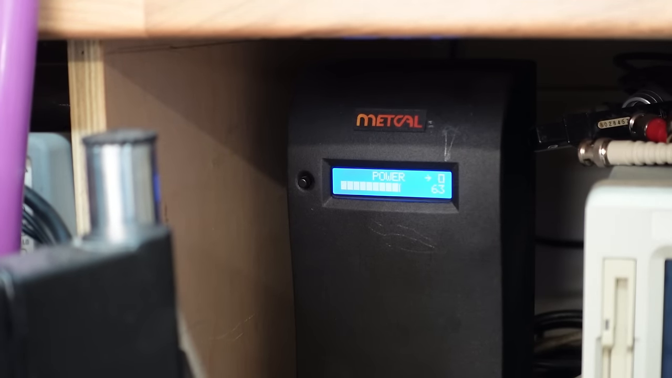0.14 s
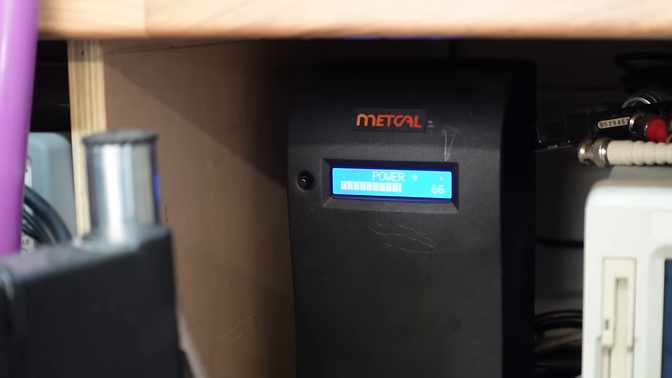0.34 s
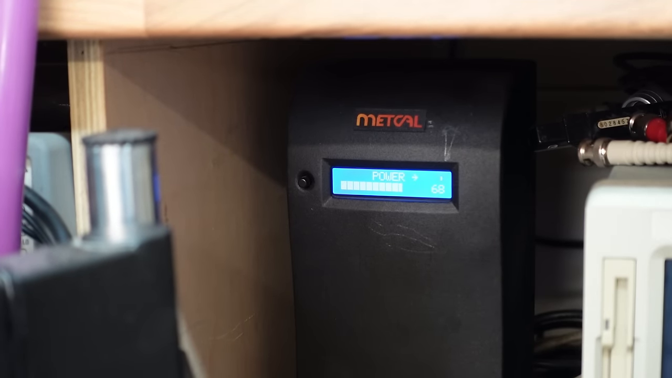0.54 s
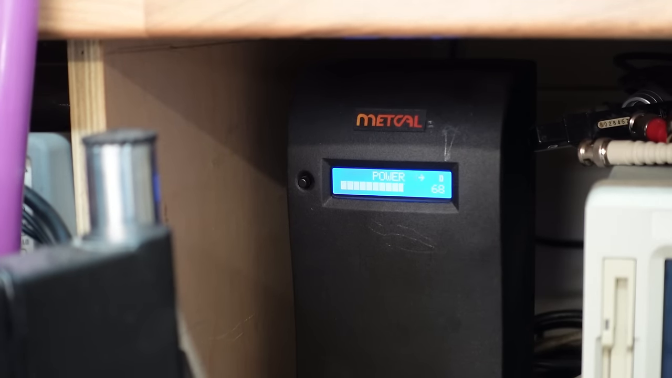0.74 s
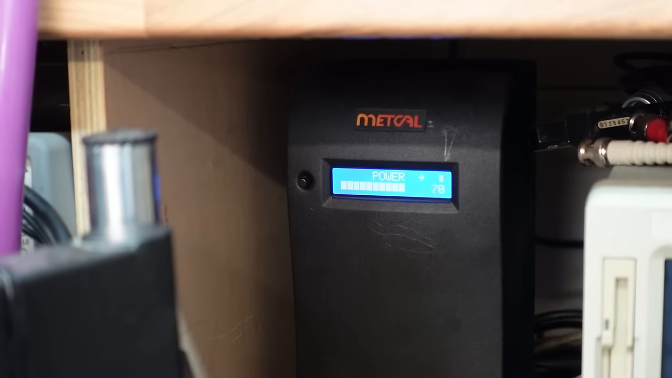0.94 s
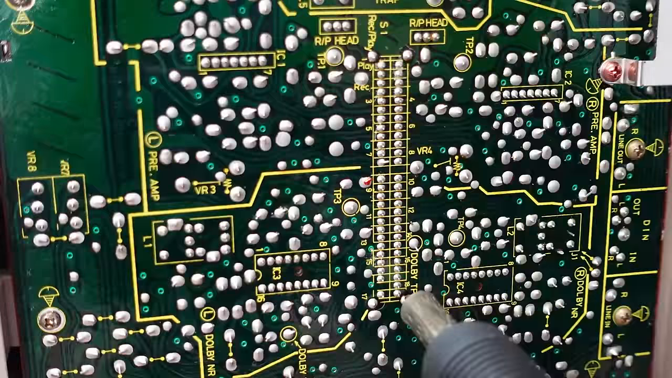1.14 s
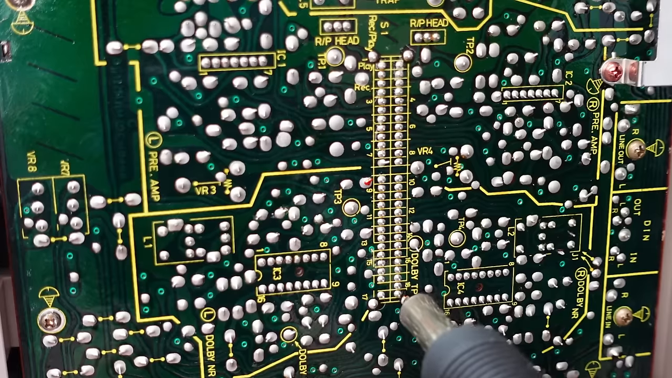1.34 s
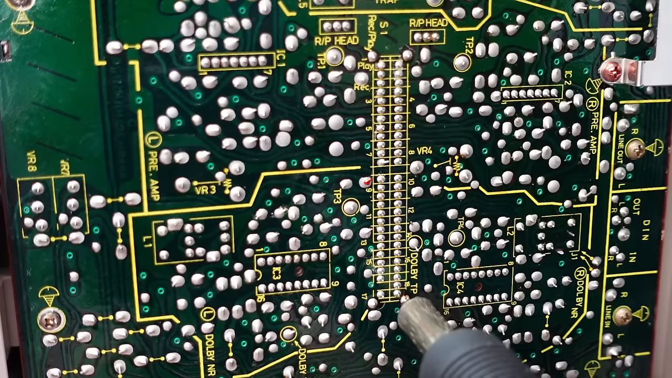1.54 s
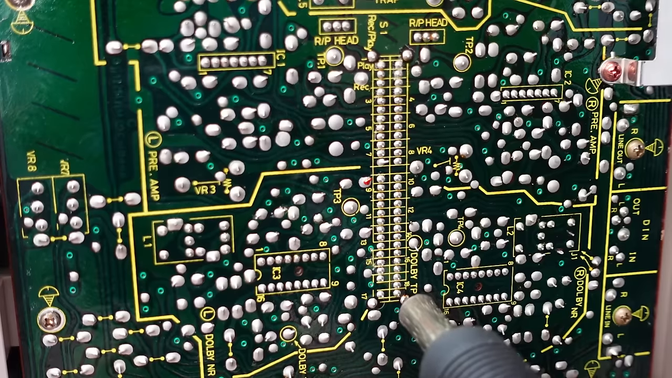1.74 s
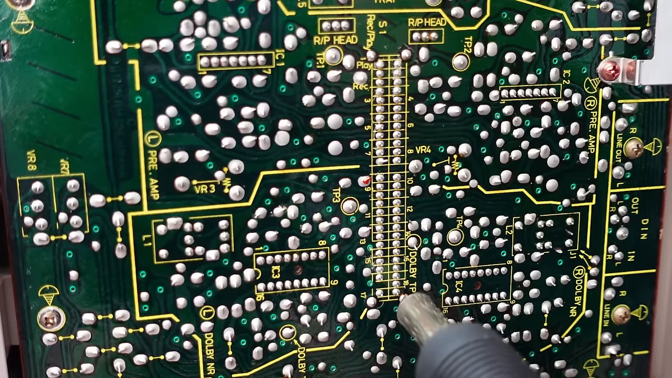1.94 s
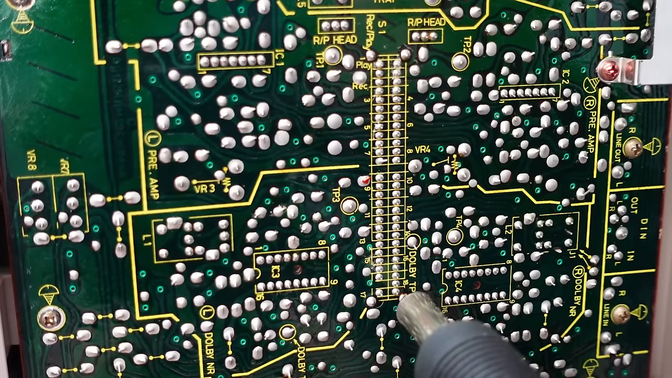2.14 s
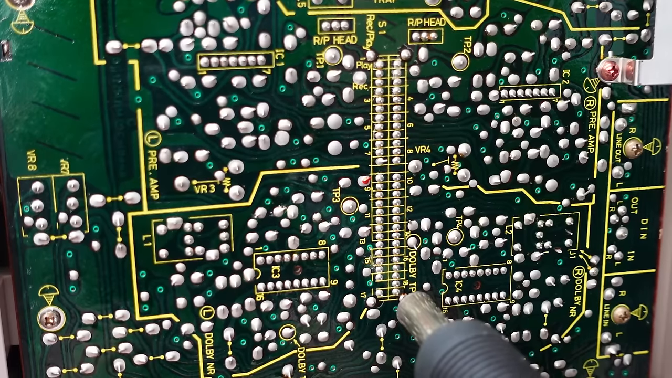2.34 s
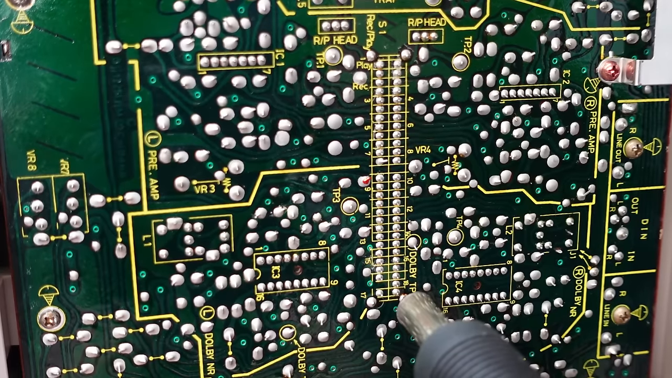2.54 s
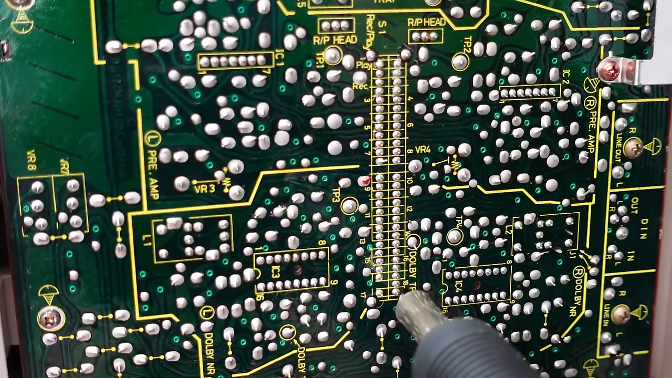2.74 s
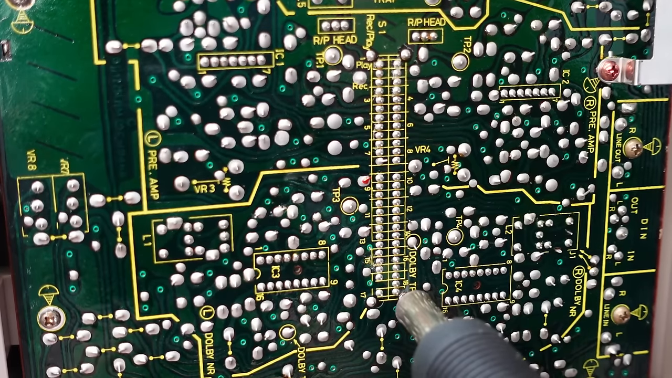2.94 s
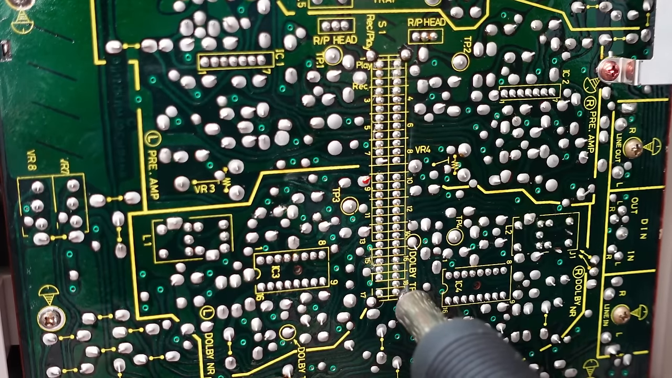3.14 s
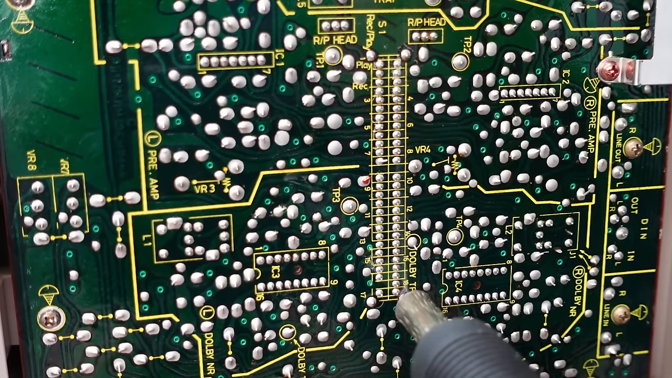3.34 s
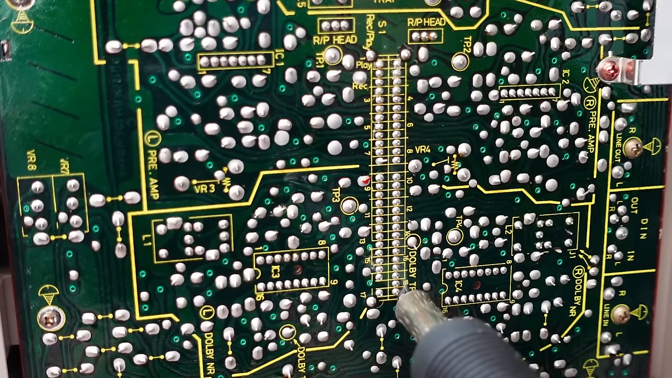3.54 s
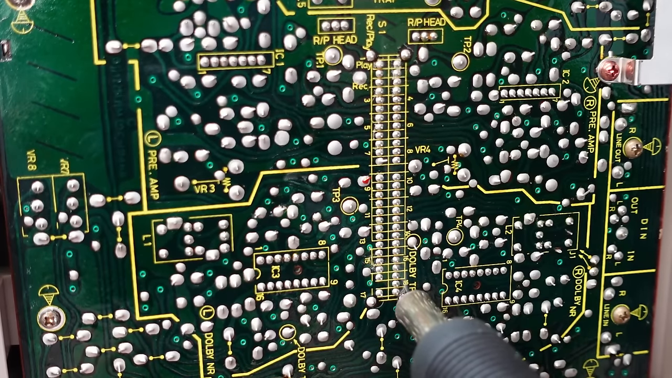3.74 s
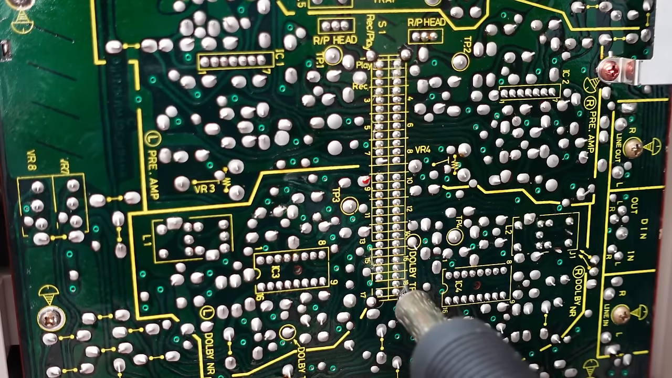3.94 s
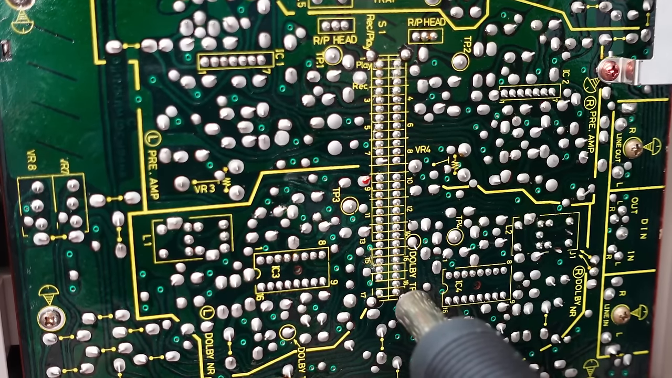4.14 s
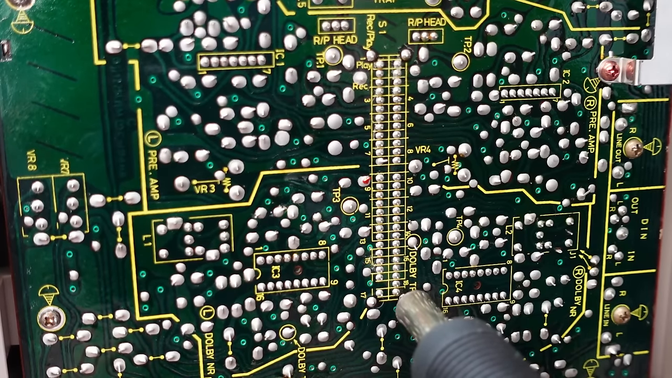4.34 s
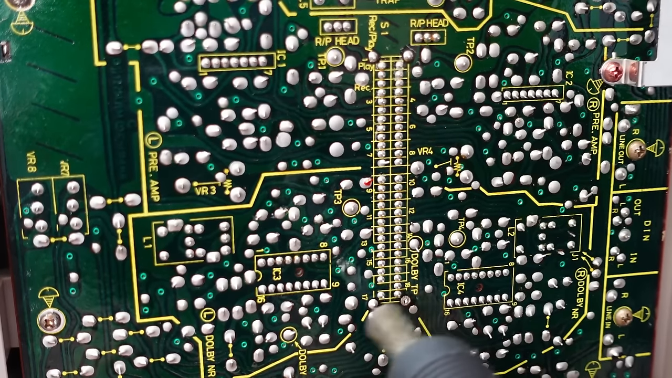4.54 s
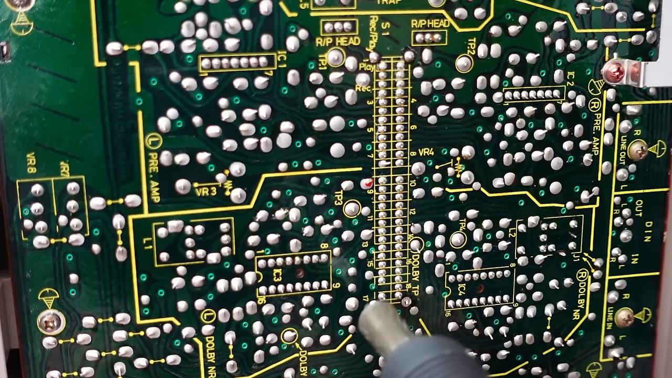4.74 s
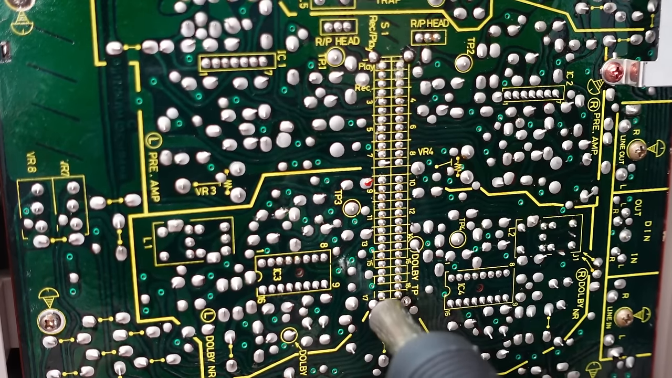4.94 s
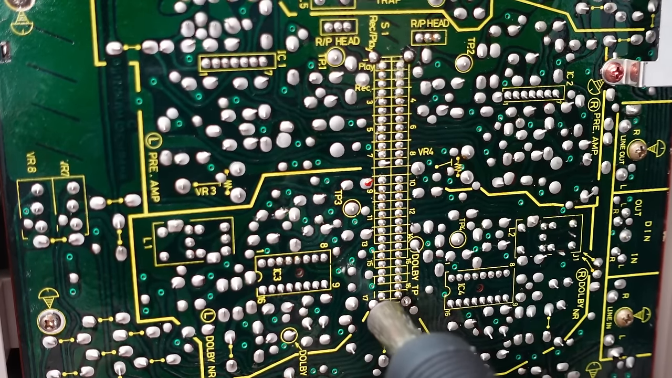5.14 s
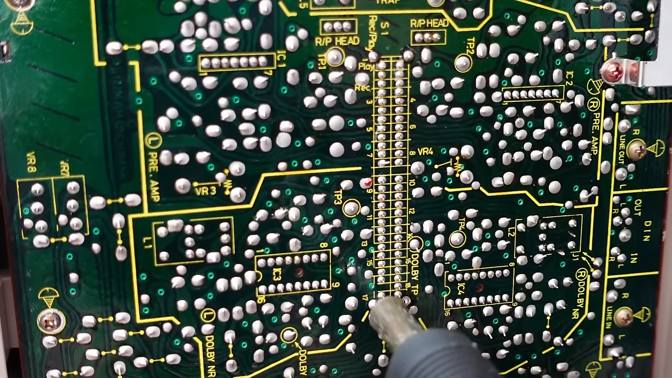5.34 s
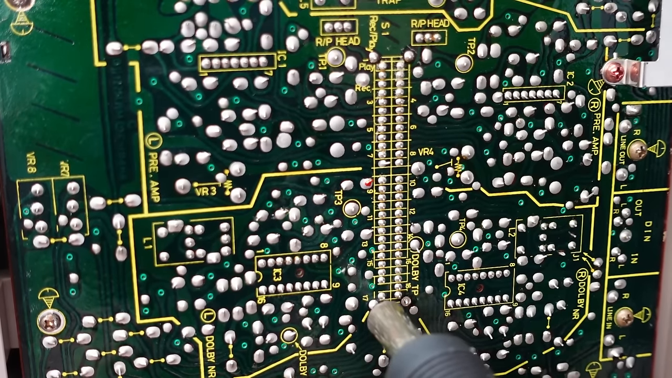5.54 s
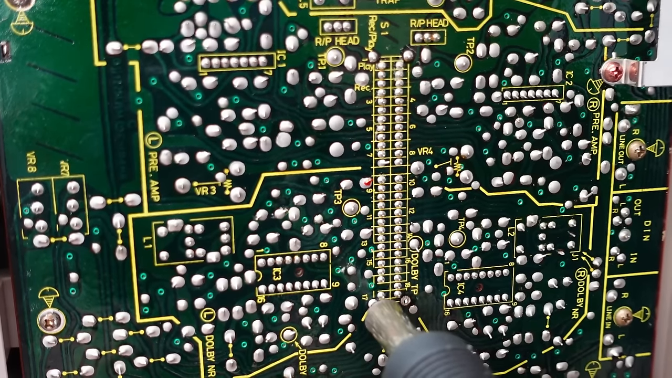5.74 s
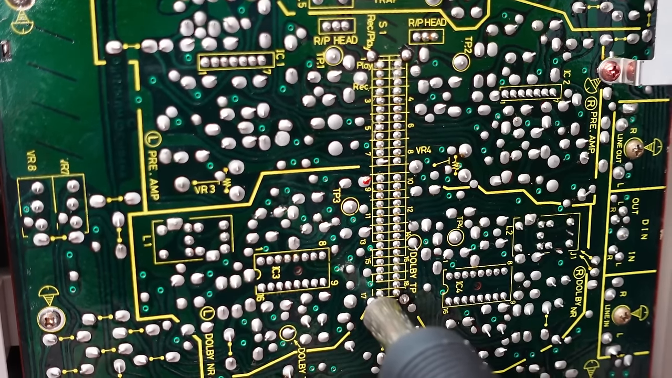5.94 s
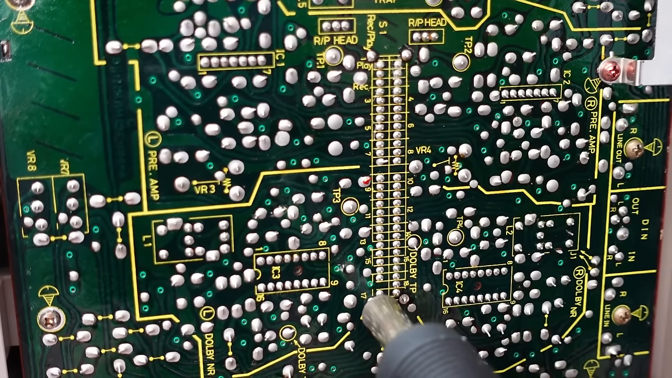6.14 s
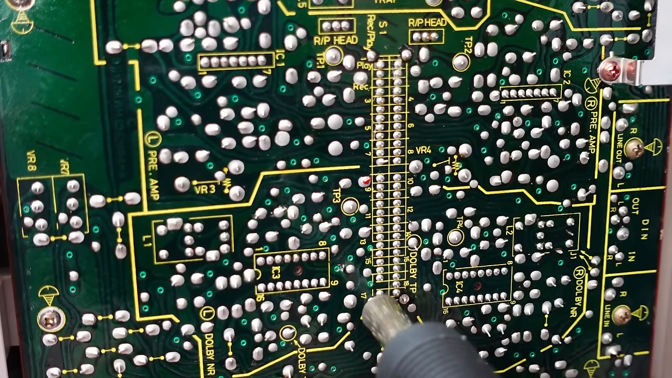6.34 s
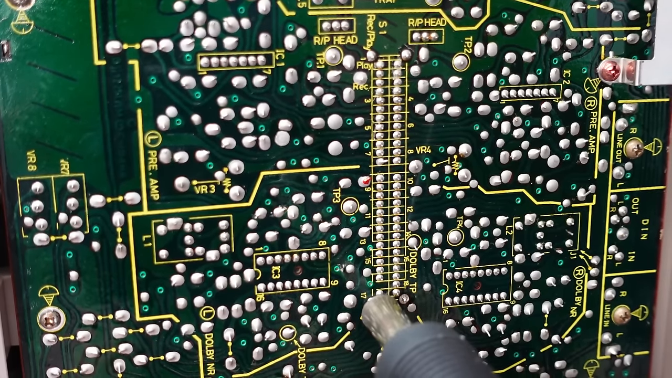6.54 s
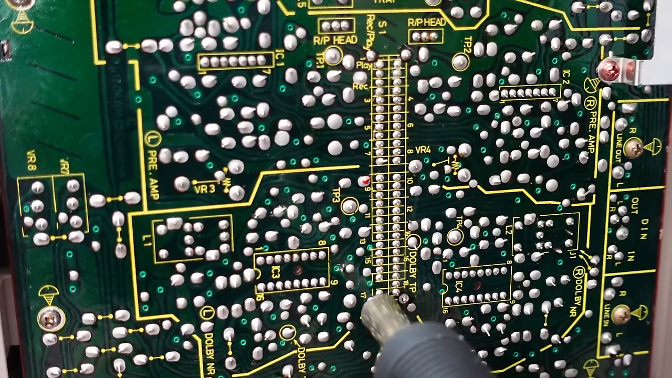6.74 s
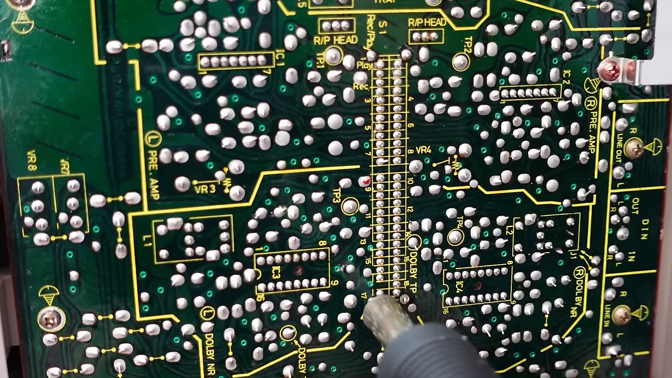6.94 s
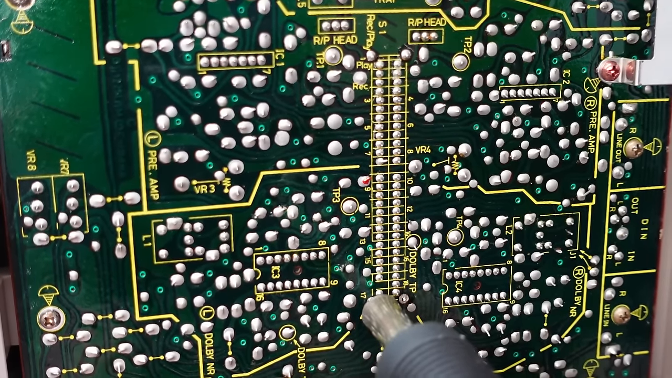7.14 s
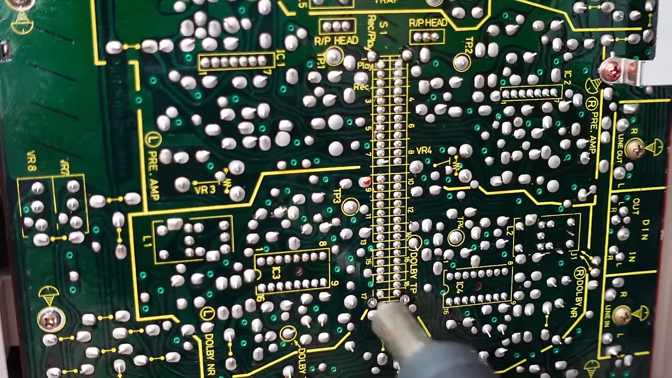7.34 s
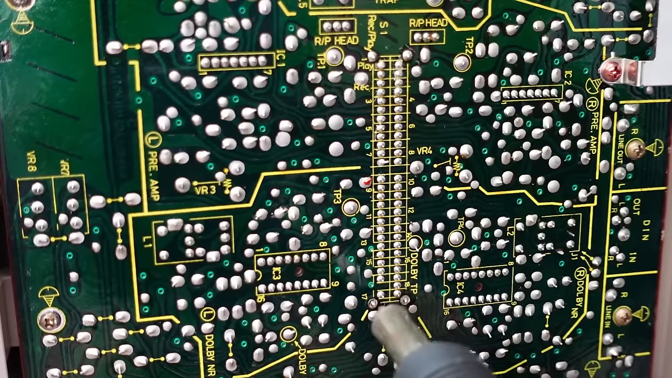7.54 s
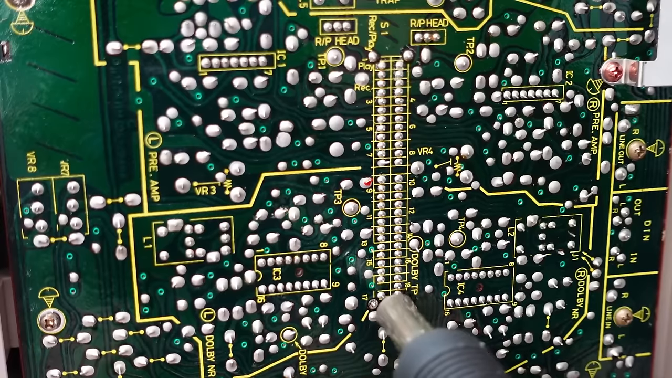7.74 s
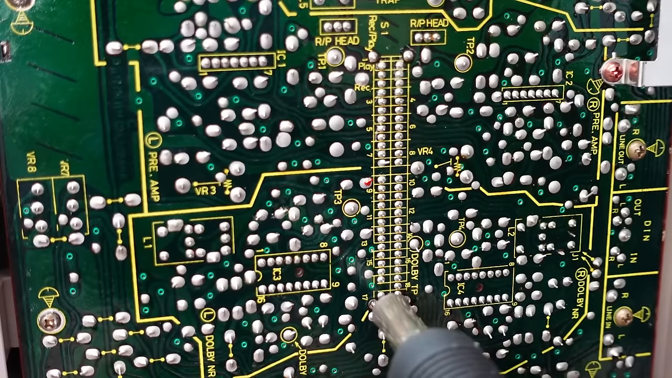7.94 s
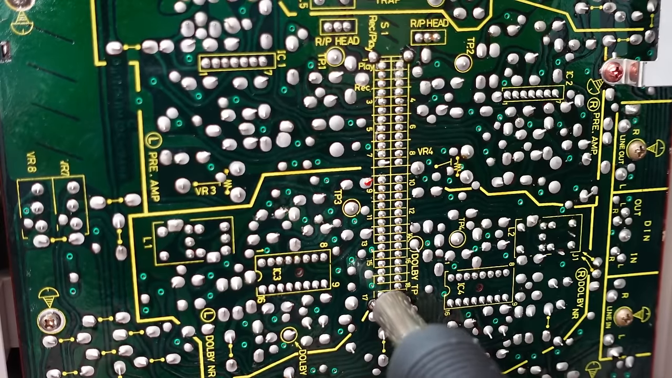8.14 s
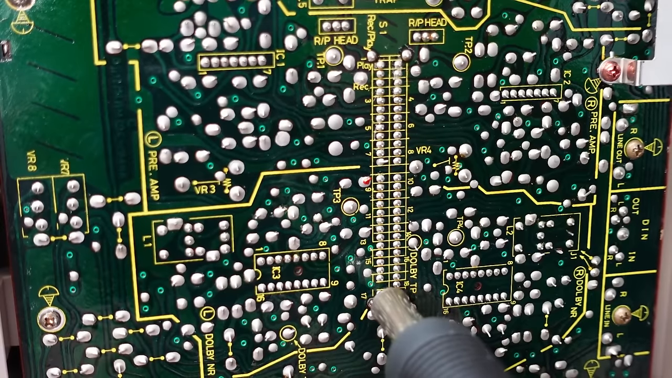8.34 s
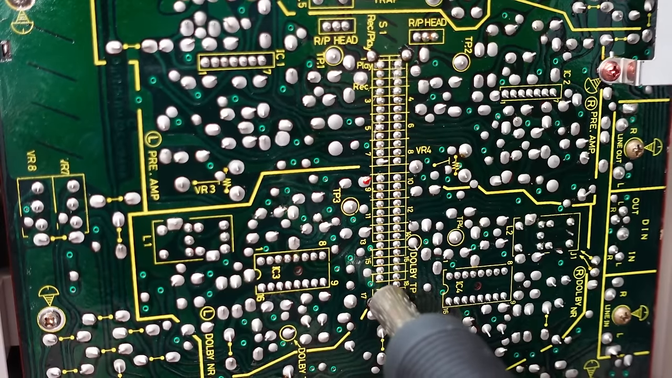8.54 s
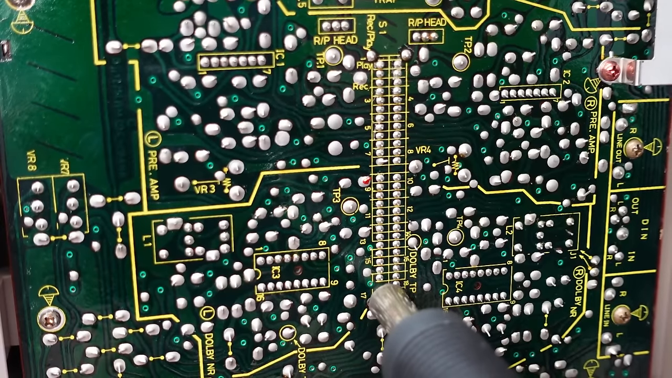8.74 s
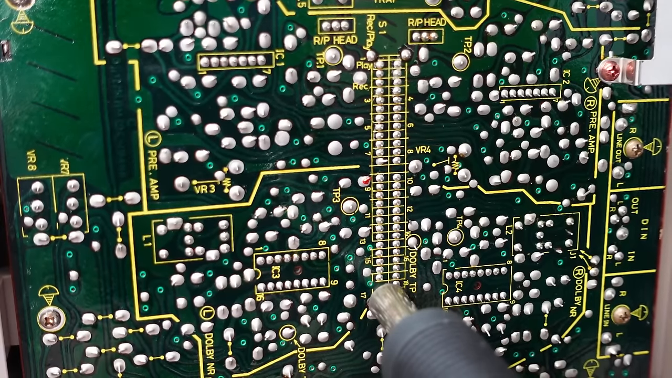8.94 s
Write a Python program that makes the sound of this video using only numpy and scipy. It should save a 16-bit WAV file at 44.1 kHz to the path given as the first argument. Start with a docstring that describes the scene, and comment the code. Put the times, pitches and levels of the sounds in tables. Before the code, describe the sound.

A desoldering gun fires two short, loud air hisses, with light knocks on a circuit board over steady fan noise.

```python
"""Desoldering gun on a workbench

An air-driven gun fires twice: its valve pops open and compressed air hisses out to pull the vacuum.
Each burst ends in a hoot and a sputter of solder. Around the bursts the handpiece knocks, scuffs and
ticks on the circuit board; fans and a faint air leak run throughout. A close mono microphone feeds
a limiter, which ducks the room under each burst."""
import sys
import numpy as np
from scipy import signal
from scipy.fft import rfft, irfft, next_fast_len
from scipy.io import wavfile
from scipy.ndimage import map_coordinates

SR = 44100
rng = np.random.default_rng(int(sys.argv[2]) if len(sys.argv) > 2 else 0)


def store_wav(level_fs):
    """Save 16-bit WAV to argv[1]."""
    pcm = np.round(np.clip(np.atleast_2d(level_fs), -1, 1) * 32767)
    wavfile.write(sys.argv[1], SR, pcm.T.astype(np.int16))


N = 396900
TIME = np.arange(N) / SR
RING = np.arange(SR // 4) / SR  # time since a blow [s]
SEAT_S = 0.0035  # the flow breaks off as the valve seats

# trigger pulls: (valve opens [s], valve shuts [s], jet [dB], closing choke [dB], opening pop [dB],
# shutting pop [dB], hoot [dB], hoot length [s], sputter length [s], nozzle draw [dB])
TRIGGER_PULLS = [(4.0476, 4.4814, 0.5, -6, -4.5, 0, -9.5, 0.026, 0.091, -55),
                 (6.834, 7.3988, 0, -3, 5.5, 1.5, -4, 0.04, 0.046, -23.5)]


def amp(db):
    """Decibels to gain."""
    return 10 ** (np.asarray(db) / 20)


def unit(x):
    """Scale to rms 1."""
    return x / np.sqrt(np.mean(x ** 2) + 1e-20)


def wobble(rate):
    """A smooth random curve, rate knots a second."""
    return map_coordinates(rng.standard_normal(int(N * rate / SR) + 4), [TIME * rate])


def colour(x, points, bands=()):
    """Minimum-phase EQ: a curve through (Hz, dB) points plus bell-shaped peaks and notches."""
    size = 2 * next_fast_len(len(x) // 2 + 4096)
    hz = np.fft.rfftfreq(size, 1 / SR)
    point_hz, point_db = np.transpose(points)
    curve = np.interp(np.log(hz + 1), np.log(point_hz), point_db)
    bells = sum(db * np.exp(-((hz - centre) / width) ** 2) for centre, width, db in bands)
    cepstrum = irfft(np.log(amp(curve + bells)))[:size // 2]
    cepstrum[1:] *= 2
    return irfft(rfft(x, size) * np.exp(rfft(cepstrum, size)))[:len(x)]


def noise(points, bands=(), size=N):
    """Coloured noise of rms 1."""
    return unit(colour(rng.standard_normal(size), points, bands))


def split(x, edge_hz, order=8):
    """Crossover: the parts of x below and above an edge."""
    low = irfft(rfft(x) / (1 + (np.fft.rfftfreq(N, 1 / SR) / edge_hz) ** order), N)
    return low, x - low


def add(track, s, sound):
    """Mix a sound into the track at time s."""
    part = track[round(s * SR):][:len(sound)]
    part += sound[:len(part)]


def envelope(start, attack, hold, fall_db_per_s):
    """Linear attack from start, hold, then a steady fall in dB."""
    age = TIME - start
    return np.clip(age / attack, 0, 1) * amp(-fall_db_per_s * np.maximum(age - attack - hold, 0))


def until(shut):
    """A gate that stays at 1, then dies quickly as the valve seats."""
    return np.exp(-np.maximum(TIME - shut, 0) / SEAT_S)


def ring(modes, scatter_db, attack):
    """Struck modes start together, at new strengths for every blow."""
    hz, db, t60 = np.transpose(modes)[:, :, None]
    db = db + scatter_db * rng.standard_normal(db.shape)
    partials = amp(db - 60 * RING / t60) * np.cos(2 * np.pi * hz * (RING - attack))
    return np.sum(partials, 0) * (1 - np.exp(-(RING / attack) ** 2))


def reflections(x, level_db, t60):
    """Nearby shelves and tools add a dense short echo that ripples the treble; the sum has rms 1."""
    tail = noise([(600, -24.0), (2000, 0.5), (15000, -5)], size=len(RING))
    tail *= amp(-60 * RING / t60) * (RING > .001)
    echo = amp(level_db) * signal.fftconvolve(x, tail / np.linalg.norm(tail))[:N]
    return unit(x + echo)


def fans_and_leak():
    """Fans rush and hum below a steady thin hiss of leaking air."""
    # spectrum of fans and leak: (frequency [Hz], level [dB])
    air_curve = [(25, -13.5), (45, -7.5), (90, -11), (280, 0.0), (450, -15), (1000, -15), (1400, -17),
                 (2000, -25), (2800, -22.5), (3500, -15), (4600, -18.2), (5800, -29), (10500, -34),
                 (15700, -40.5)]
    # its peaks and dips: (centre [Hz], width [Hz], gain [dB])
    air_bands = [(168, 5.7, 6.5), (245, 72, -1.5), (401.3, 5.4, 9.5), (515, 60, 4), (648, 77, 8),
                 (943, 136, 7), (1112, 51, 4.5), (1222, 12, 5.5), (1520, 8.5, 10), (1668, 130, 6),
                 (2134, 270, 5.5), (3950, 430, 5), (6840, 460, 7), (7686, 890, 11.5), (15559, 80, 11)]
    # fan tones: (frequency [Hz], level [dB])
    fan_tones = [(172.3, -70), (500.6, -64), (678.3, -60), (899.0, -61), (1195, -63), (1507, -71),
                 (1653, -65.5)]
    # faint tones that come and go: (start [s], end [s], frequency [Hz], level [dB])
    drones = [(0, 1.4, 1058, -59), (0, 1.2, 15590, -71), (1.8, 10, 1686, -64), (7.42, 8.65, 89.5, -53.5)]
    fans_db, leak_db, fans_early_db, leak_early_db = -45.5, -47, -2, -1
    early = TIME < 1.21  # the fans and leak sound softer until 1.21 s, then the background steps up
    fans, leak = split(noise(air_curve, air_bands), edge_hz=2400)
    leak = reflections(leak, level_db=-11, t60=.12) * amp(leak_db + leak_early_db * early)
    fans = unit(fans) * amp(fans_db + fans_early_db * early + 0.12 * wobble(4.5))
    tone = lambda hz: np.sqrt(2) * np.sin(2 * np.pi * hz * TIME + .5 * wobble(6))
    hum = amp(fans_early_db * early) * sum(amp(db) * tone(hz) for hz, db in fan_tones)
    for start, end, hz, db in drones:
        fade = np.clip(np.minimum(TIME - start, end - TIME) / 0.016, 0, 1)
        hum += amp(db) * tone(hz) * fade
    return fans + leak + hum


def board_knocks():
    """Soft contacts of the handpiece thud, hard ones snap and click; all ring the same board."""
    # knocks: (time [s], level [dB], thud EQ [dB], snap EQ [dB], click EQ [dB])
    hits = [(1.2137, 1, 1.5, 1.5, -6), (1.239, -12, 2, -6, -2), (1.5434, -0.5, 2, 1.5, -6),
            (1.666, -4.5, -7.5, 2, -8), (1.8176, -17, 16.5, -7, -3), (2.7605, -8.5, -5, -2.5, -3),
            (4.548, -6, 2.5, 9.5, -4), (5.257, -18, 16, 5.5, 10), (5.2938, -30, 25, -6, 5),
            (5.5414, -2.5, 5, 5, 8.5), (5.5775, -7.5, 2, -3, 0), (7.9111, -16, 6, -7, 0),
            (8.0662, -28.5, 21, 1, 9), (8.0988, -14, -4, 2.5, 3), (8.194, -15.5, 18, -4, -3),
            (8.558, -17.5, 16.5, 0.5, 4)]
    # modes of board and bench: (frequency [Hz], level [dB], t60 [s])
    board_modes = [(168, -16, 0.13), (211, -9, 0.12), (295.4, -6, 0.11), (325, -5, 0.13), (400, -3, 0.036),
                   (551, -3, 0.068), (682, -5.5, 0.12), (713, -6, 0.064), (880, -11, 0.067),
                   (977, -16, 0.12), (1110, -8, 0.13), (1297, -0.5, 0.072), (1370, 0.5, 0.037),
                   (1420, 0, 0.042), (1770, -10, 0.1), (1940, 1, 0.035), (2127, -5, 0.042),
                   (2180, -14, .04), (2450, -6.5, 0.037), (2550, -15, 0.036), (2980, -5.5, 0.019),
                   (4760, -14, 0.051)]
    # spectrum of the dense upper and cross modes: (frequency [Hz], level [dB])
    rattle_curve = [(60, -17), (200, -2), (700, 8), (2000, -1), (3200, -8.5), (4800, -14.5), (6000, -23),
                    (8000, -19), (15000, -42)]
    # spectrum of the bench's after-ring: (frequency [Hz], level [dB])
    bench_curve = [(80, -29), (290, 4.5), (700, 6.5), (1500, -5), (3000, -18), (9000, -44)]
    pulse_age = RING / .0001
    push = amp(-6) * pulse_age ** 2 * (3 - pulse_age) * np.exp(-pulse_age)  # the first pressure pulse
    swell = 1 - np.exp(-RING / .001)
    track = np.zeros(N)
    for s, db, thud_db, snap_db, click_db in hits:
        rattle = swell * amp(-19 - 60 * RING / 0.079) * noise(rattle_curve, size=len(RING))
        bench = amp(-31 - 60 * RING / 0.33) * noise(bench_curve, size=len(RING))
        board = amp(-21) * ring(board_modes, scatter_db=1.5, attack=.0002)
        contact_eq = [(90, 0), (250, thud_db), (800, 0), (1400, 0), (2300, snap_db), (3200, snap_db),
                      (5000, click_db), (14000, click_db - 0.5)]
        add(track, s, amp(db) * colour(push + board + rattle + bench, contact_eq))
    return track


def tip_scuffs():
    """The tip slides softly over the board in brief grainy rubs that swell and fade."""
    # rubs: (middle [s], half length [s], level [dB])
    rubs = [(1.818, 0.0075, -33.5), (2.718, .02, -44), (2.743, 0.013, -41), (5.405, 0.0095, -36.5),
            (5.73, 0.019, -39), (6.072, 0.0093, -39), (6.094, 0.013, -38.5), (7.973, .005, -43)]
    # friction spectrum: (frequency [Hz], level [dB])
    scrape_curve = [(70, -35), (280, 13.5), (700, -0.5), (2100, -1), (3200, -12), (6000, -21), (14000, -32)]
    pressure = sum(amp(db) * np.exp(-((TIME - s) / length) ** 2) for s, length, db in rubs)
    grain = amp(2 * wobble(400))
    return pressure * unit(grain * noise(scrape_curve))


def tip_ticks():
    """The steel tip touches pins: a speck of contact noise and one short, clear ping each."""
    # touches: (time [s], level [dB], pitch [Hz])
    touches = [(1.994, -45, 10000), (3.0103, -33.5, 3260), (8.0986, -25, 2700), (8.1005, -56, 10800),
               (8.6473, -47, 9500)]
    contact_db, contact_t60, ping_db, ping_t60 = -5.5, 0.028, 0.5, 0.031
    track = np.zeros(N)
    for s, db, hz in touches:
        contact = noise([(hz / 4, -22), (hz, -6), (hz * 2, -20), (hz * 4, -32)], size=len(RING))
        contact *= amp(contact_db - 60 * RING / contact_t60)
        ping = np.sin(2 * np.pi * hz * RING) * amp(ping_db - 60 * RING / ping_t60)
        add(track, s, amp(db) * (contact + ping))
    return track


def valve_pops():
    """Each pressure step gives a short hollow pop: trigger, opening, shutting."""
    # modes of the valve body and air line: (frequency [Hz], level [dB], t60 [s])
    valve_modes = [(170, -16, 0.019), (320, -7.5, 0.024), (655, -18, 0.0067), (920, -1, 0.02),
                   (1230, -12, 0.02)]
    trigger_lead_s, trigger_db = 0.00417, -19.5
    track = np.zeros(N)
    for opens, shut, _, _, open_db, shut_db, *_ in TRIGGER_PULLS:
        for s, db in (opens - trigger_lead_s, trigger_db), (opens, open_db), (shut, shut_db):
            add(track, s, -amp(db) * ring(valve_modes, scatter_db=2, attack=0.00016))
    return track


def airflow(opens, shut, db, choke_db):
    """One pull: a surge, steady flow, a choke as the valve closes, then the gun bleeds empty."""
    open_s, close_s = 0.0015, 0.038  # travel times of the valve
    surge_db, surge_s = 2, 0.11  # the line pressure overshoots at first
    surge = surge_db * np.exp(-np.maximum(TIME - opens, 0) / surge_s)
    choke = choke_db * np.clip(2 * (1 + (TIME - shut) / close_s), 0, 1)
    driven = amp(db + surge + choke) * np.clip((TIME - opens) / open_s, 0, 1) * until(shut)
    bleed = amp(-10.5) * envelope(shut, SEAT_S, hold=0.028, fall_db_per_s=350)
    trickle = amp(-38.5) * envelope(shut, SEAT_S, hold=0, fall_db_per_s=63)
    return np.maximum(driven, np.hypot(bleed, trickle))


def exhaust_jet():
    """The exhaust hisses; as pressure falls its roar fades sooner than its fizz."""
    # exhaust spectrum: (frequency [Hz], level [dB])
    jet_curve = [(250, -66), (500, -22.5), (700, -20), (900, -8), (1500, -3.5), (3000, 1), (6500, -0.5),
                 (9000, -4), (12000, -11.5), (15700, -13)]
    # peaks and notches of the exhaust passage: (centre [Hz], width [Hz], gain [dB])
    passage_bands = [(586, 42, -5.5), (670, 43, 5.5), (1240, 84, 2), (1710, 24, 5), (2100, 210, -3.5),
                     (2525, 43, 2), (2720, 41, 1), (2684, 24, 3), (3410, 170, 3.5), (3590, 55, 2.5),
                     (3910, 66, -5.5), (4180, 19, 2), (4360, 26, 5), (4350, 64, -2), (4990, 190, 3.5),
                     (5530, 160, -4), (5850, 46, 3.5), (6200, 95, 5), (6600, 260, 4.5), (7700, 98, 0.5),
                     (8470, 65, 4), (9030, 120, -1), (10110, 125, 8.5), (10300, 70, -4), (10780, 160, 8.5),
                     (11400, 140, 8.5), (12450, 280, 3.5), (13400, 220, 5), (14600, 110, -1),
                     (15150, 170, -6)]
    flow = sum(airflow(*pull[:4]) for pull in TRIGGER_PULLS)
    hiss = reflections(noise(jet_curve, passage_bands), level_db=-14, t60=.1)
    roar, fizz = split(hiss, edge_hz=3160)
    turbulence = amp(2.0 + 0.34 * wobble(25) + 0.62 * wobble(170))
    return turbulence * (roar * flow ** 1.4 + fizz * flow)


def hoot_and_slurp():
    """The closing valve hoots, solder spits and sputters, then the vacuum dies through the nozzle."""
    # hoot of the narrowing valve gap: (frequency [Hz], level [dB])
    gap_curve = [(400, -30), (800, -16), (1150, -3), (1750, -7), (2200, -29), (6000, -38)]
    # solder and flux sputtering through the tip: (frequency [Hz], level [dB])
    slurp_curve = [(100, -24), (280, 3), (450, 0), (650, 3.5), (1100, 7), (1500, -4), (3000, -21),
                   (8000, -45)]
    # air drawn through the open nozzle: (frequency [Hz], level [dB])
    draw_curve = [(400, -12), (900, -5.5), (1500, -2.5), (3000, -10.5), (4500, -8.5), (6000, -18),
                  (12000, -29)]
    # peaks and a notch of the narrow tip: (centre [Hz], width [Hz], gain [dB])
    tip_bands = [(1346, 50, 9.5), (1590, 64, 8), (2320, 240, 13), (2870, 90, -2), (3140, 160, 12.5)]
    spit_s = 0.003
    narrowing, solder, vacuum = np.zeros((3, N))
    for _, shut, *_, hoot_db, hoot_s, sputter_s, draw_db in TRIGGER_PULLS:
        narrowing += amp(hoot_db) * np.clip(1 + (TIME - shut) / hoot_s, 0, 1) * until(shut - SEAT_S)
        spit = amp(-7.5) * envelope(shut - spit_s / 2, spit_s, hold=0, fall_db_per_s=1100)
        dribble = amp(-19.5) * envelope(shut, spit_s, hold=0.02, fall_db_per_s=26 / sputter_s)
        solder += np.maximum(spit, dribble)
        suction = amp(draw_db) * envelope(shut, attack=0.031, hold=0, fall_db_per_s=56.5)
        vacuum += suction * envelope(shut, SEAT_S, hold=0.36, fall_db_per_s=200)
    hoot = narrowing * noise(gap_curve)
    sputter = solder * amp(0.89 * wobble(160)) * noise(slurp_curve)
    draw = vacuum * amp(0.41 * wobble(60)) * noise(draw_curve, tip_bands)
    return hoot + sputter + draw


def scene():
    """Gun, board and room reach one microphone."""
    gun = exhaust_jet() + hoot_and_slurp() + valve_pops()
    mono = gun + board_knocks() + tip_scuffs() + tip_ticks() + fans_and_leak()
    return np.array([mono, mono])


def limiter(x, ceiling_db, attack, release, slow_release, slow_share):
    """Gain drops when the power passes the ceiling, and returns quickly at first, then slowly."""
    pole = np.exp(-1 / (attack * SR))
    power = signal.lfilter([1 - pole], [1, -pole], np.mean(x ** 2, 0))
    excess_db = np.maximum(10 * np.log10(power + 1e-12) - ceiling_db, 1e-6)
    # catch each peak of the excess and let it decay exponentially
    held = lambda life: np.exp(np.maximum.accumulate(np.log(excess_db) + TIME / life) - TIME / life)
    return x * amp(-(1 - slow_share) * held(release) - slow_share * held(slow_release))


def record(dry):
    """Limiter, soft clipping of the peaks, then a steep high cut."""
    clip_level, top_hz = .78, 15900
    x = limiter(dry, ceiling_db=-11.5, attack=0.0032, release=0.042, slow_release=0.34, slow_share=0.4)
    x = x / (1 + (x / clip_level) ** 16) ** (1 / 16)
    edge = np.clip((top_hz - np.fft.rfftfreq(N, 1 / SR)) / 160, 0, 1)
    return irfft(rfft(x) * np.sin(edge * np.pi / 2) ** 2, N)


dry = scene()
out = record(dry)
store_wav(out)
```